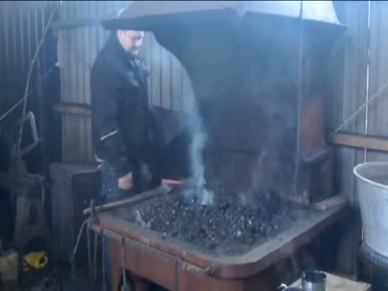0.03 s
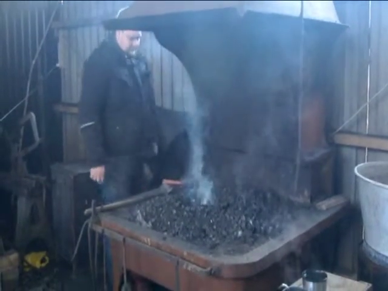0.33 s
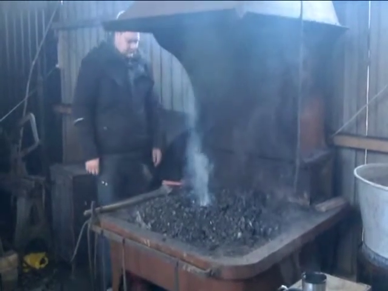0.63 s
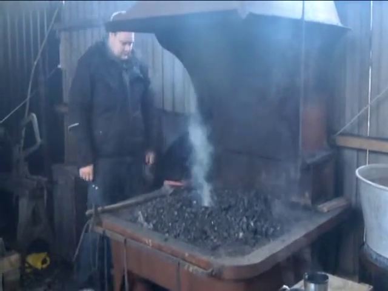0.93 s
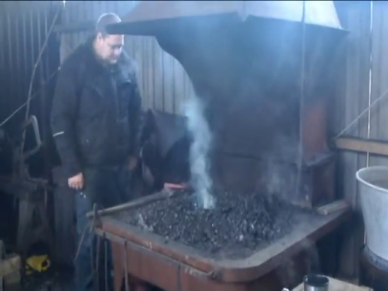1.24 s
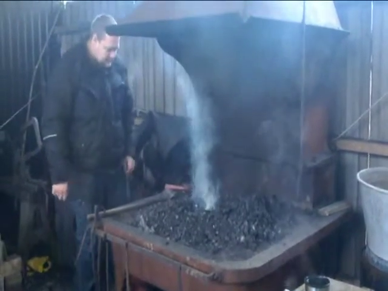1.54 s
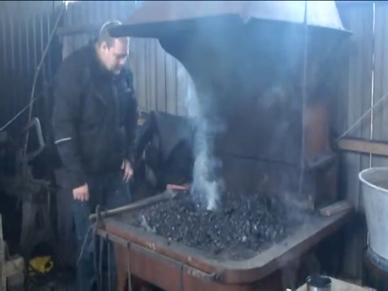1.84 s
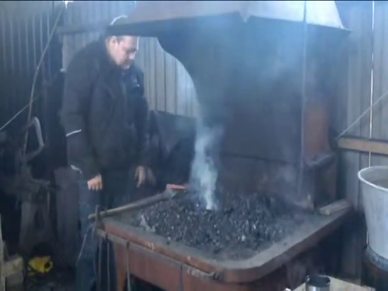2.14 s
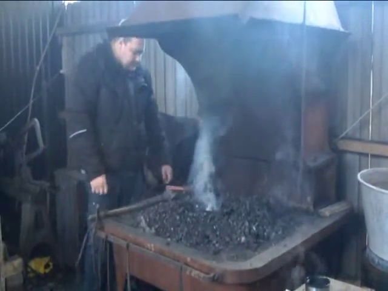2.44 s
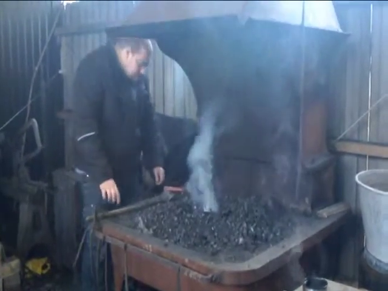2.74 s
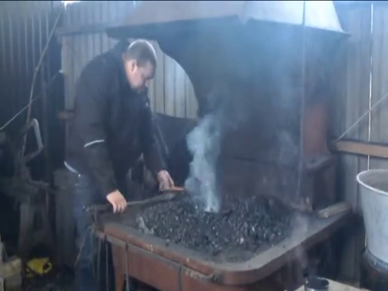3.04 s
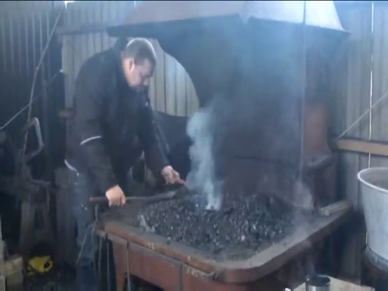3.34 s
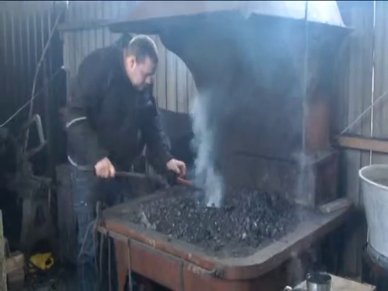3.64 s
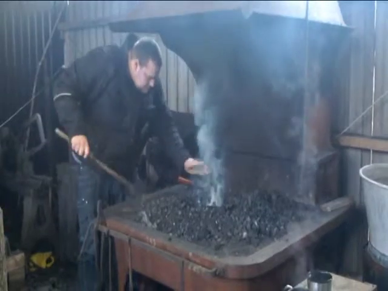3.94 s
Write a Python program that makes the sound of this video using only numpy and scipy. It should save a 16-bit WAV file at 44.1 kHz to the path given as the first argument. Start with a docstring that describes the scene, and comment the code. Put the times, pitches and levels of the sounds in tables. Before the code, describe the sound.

An electric blower hums steadily, feeding a coal forge, with one iron tool knock.

```python
"""An electric blower hums as it feeds a coal forge in a small sheet-metal workshop.
Its spinning blades make the hum, while air rushes through the duct and hisses out of the coal bed.
The coals tick faintly, and a few soft, low thumps sound underneath.
Near the end an iron tool knocks once on the hearth and rings briefly."""
import sys
import numpy as np
from scipy import signal
from scipy.fft import rfft, irfft
from scipy.io import wavfile
from scipy.ndimage import uniform_filter1d

SR = 44100
rng = np.random.default_rng(int(sys.argv[2]) if len(sys.argv) > 2 else 0)


def digitize_waveform(pressure):
    """Quantize a signal to 16-bit integers and store it at the path in sys.argv[1].

    Rows of a 2-D input are taken as channels; values are limited to [-1, 1].
    """
    field = np.atleast_2d(pressure).T
    bounded = np.clip(field, -1, 1)
    quanta = np.round(bounded * 32767).astype(np.int16)
    wavfile.write(sys.argv[1], SR, quanta)


N = 4 * SR

# How long the room takes to fade by 60 dB: pitch_hz, fade_s
ROOM_FADE = [(500, 0.24), (5000, 0.33), (8000, .27), (15000, .15)]
# Echoes from the hood and walls: delay_s, gain
ECHOES = [(.0035, 0.19), (.0065, 0.35), (.01, .27), (.0175, 0.25), (.0225, .22), (.027, .22), (.037, 0.11)]
# Faint noise, separate in each channel, with a low bump near 200 Hz: pitch_hz, relative_db
SIDE_NOISE_COLOUR = [(50, -6), (200, 0), (1100, -16), (2300, 7.5), (3600, -6), (4600, -9), (7400, -6), (8500, 5),
                     (15500, 15)]
# Soft, low thumps: middle_s, level_db
THUMPS = [(.785, -24), (1.195, -25.5), (2.62, -29), (3.525, -26)]
# Ticks and scuffs at the coals: start_s, level_db, fade_s, brightness_db_per_octave
TICKS = [(.99, -32, 0.016, -10), (1.153, -32, .015, -3), (1.468, -35, .025, 1), (1.789, -33, .04, -11),
         (1.961, -40, .025, -1), (2.98, -41, .015, 7), (3.109, -39, .009, 15), (3.16, -46, .009, 13),
         (3.97, -35, .015, -5)]
# Tone of the ticks and crackles: pitch_hz, relative_db
TICK_COLOUR = [(2000, -34), (3500, -16), (4500, 5), (7500, 6.5), (9000, -6), (11000, -4), (13500, -11),
               (15500, -21)]
# Tone of the tool's sharp crack: pitch_hz, relative_db
KNOCK_COLOUR = [(400, -13), (1500, -29), (2600, -22), (3800, -13), (4350, 2), (4850, 5.5), (5600, -2),
                (7700, 3.5), (9000, -8), (10700, 1.5), (12000, -8.5), (16000, -11)]
# Ringing notes of the iron, each fading by 60 dB: pitch_hz, level_db, fade_s
IRON_NOTES = [(4427, -30, 0.052), (4670, -18.5, 0.12), (4867, -28, 0.055), (6530, -41, .08),
              (7300, -26, 0.13), (9660, -37, .06)]
# Tone of the air leaving the coal bed: pitch_hz, relative_db
HISS_COLOUR = [(600, -30), (1950, -25), (2600, -21), (3300, -15), (3750, -13.5), (4250, -3.5), (4650, 0.2),
               (5350, -6.5), (6700, -5.5), (7400, -3), (8100, -12.5), (9050, -23.5), (9800, -13),
               (10500, -22.5), (11900, -27.5), (13200, -24.5), (14200, -34), (15700, -48)]
# Slight rise and fall of the hiss: time_s, change_db
HISS_SWELL = [(0, 0), (1, 0.2), (1.65, 0), (1.95, 0.6), (2.25, 0), (2.6, -0.6), (3.05, 0), (3.45, 0),
              (4, -0.5)]
# Tone of the air in the duct: pitch_hz, relative_db
RUSH_COLOUR = [(4, -23), (12, 13), (22, -2), (45, -2.5), (78, -9), (100, -14), (116, -2), (148, -9),
               (210, -4), (255, -8.5), (290, -9.5), (312, -18.5), (372, -19), (430, -13), (485, -13.5),
               (545, -21), (660, -22), (740, -15), (800, -8), (1040, -13.5), (1130, -17), (1370, -19.5),
               (1450, -25), (1650, -35), (2100, -53), (4000, -69)]
# Hollow notes of the duct and fan housing: pitch_hz, width_hz, level_db
DUCT_NOTES = [(62.8, 7.4, -46), (169.3, 11.3, -36), (182, 18, -36.5), (272.2, 18.7, -40.5),
              (855.8, 34.5, -40), (984, 18, -51.5), (1054, 6.7, -49.5), (1272, 35, -47.5), (1342, 35, -51),
              (1742, 54, -66)]
# How fast the blades pass and how the loudness shifts: time_s, blade_hz, change_db
FAN_SPEED = [(0, 195.45, 0), (.9, 195.3, 0.8), (1.6, 195.4, 0.3), (2.3, 195.4, -0.1), (4, 195.4, -0.1)]
# Tones in the fan's hum: cycles_per_turn, level_db
HUM_TONES = [(3, -46.5), (4, -23.5), (7, -53), (8, -46), (12, -60.5), (16, -41.5), (20, -53.5), (24, -58.5),
             (36, -68.5)]


def amp(db):
    """Turns decibels into a number to multiply by."""
    return 10 ** (np.asarray(db) / 20)


def unit(x):
    """Scales a signal to an average strength (rms) of 1."""
    return x / np.sqrt(np.mean(x ** 2) + 1e-20)


def read(points, hz):
    """Looks up a pitch in a table, sliding between rows on an octave scale."""
    pitches, values = np.transpose(points)
    return np.interp(np.log(hz + 1), np.log(pitches + 1), values)


def bins():
    """The frequencies in Hz that make up the whole sound."""
    return np.fft.rfftfreq(N, 1 / SR)


def noise(gain):
    """Noise of strength 1, with each frequency weighted by gain."""
    return unit(irfft(rfft(rng.standard_normal(N)) * gain, N))


def drift(rate_hz):
    """A smooth random wobble, mostly slower than rate_hz."""
    return noise(np.exp(-(bins() / rate_hz) ** 2) * (bins() > 0))


def colour(x, points):
    """Gives a sound the tone described in a table."""
    hz = abs(np.fft.fftfreq(2048, 1 / SR))
    log_gain = np.log(amp(read(points, hz)))
    taps = np.fft.ifft(np.exp(np.conj(signal.hilbert(log_gain)))).real  # rings only after a hit
    return signal.oaconvolve(x, taps / np.linalg.norm(taps))[:N]


def workshop(x):
    """The hood and walls add quick echoes and a short fading tail to a sound."""
    hz, t, spectrum = signal.stft(rng.standard_normal(SR // 2), SR, nperseg=256)
    fade = amp(-60 * t / read(ROOM_FADE, hz)[:, None])
    rise = np.minimum(t / .008, 1)
    response = signal.istft(spectrum * fade * rise, SR, nperseg=256)[1]
    response *= amp(-1.5) / np.linalg.norm(response)
    response[0] += 1  # the direct sound
    for delay_s, gain in ECHOES:
        response[round(delay_s * SR)] += gain
    return signal.fftconvolve(x, response)[:N]


def thumps(pitch_hz=37.7, width_s=.022):
    """Each thump, perhaps a shifting foot, is a wave or two of deep bass."""
    t, out = np.arange(N) / SR, np.zeros(N)
    for middle_s, level_db in THUMPS:
        swell = amp(level_db) * np.exp(-((t - middle_s) / width_s) ** 2)
        out += swell * np.sin(2 * np.pi * (pitch_hz * (t - middle_s) + rng.random()))
    return out


def coal_ticks(crackles_per_s=14):
    """The coals give a few gritty ticks and scuffs over tiny scattered crackles."""
    t = np.arange(N) / SR
    crackles = amp(-26) * rng.standard_normal(N) * (rng.random(N) < crackles_per_s / SR)
    out = colour(crackles, TICK_COLOUR)
    for start_s, level_db, fade_s, brightness in TICKS:
        fade = (t >= start_s) * np.exp(-abs(t - start_s) / fade_s)
        grit = amp(level_db) * fade * unit(rng.laplace(size=N))
        tone = [(hz, db + brightness * np.log2(hz / TICK_COLOUR[0][0])) for hz, db in TICK_COLOUR]
        out += colour(grit, tone)
    return out


def tool_knock(start_s=3.618, hold_s=.0021, crack_fade_s=.001):
    """Iron hits iron with a hard crack and a short ring."""
    t = np.arange(N) / SR - start_s
    age = np.maximum(t, 0)
    crack = (t >= 0) * np.exp(-np.maximum(age - hold_s, 0) / crack_fade_s) * rng.standard_normal(N)
    ring = sum(amp(db - 60 * age / fade_s) * np.sin(2 * np.pi * hz * age)
               for hz, db, fade_s in IRON_NOTES)
    return amp(-14) * colour(crack, KNOCK_COLOUR) + ring


def coal_hiss(level_db=-31.5, flicker_db=.31, patch_db=.5, room_share=.28):
    """Jets of air hiss through the coal bed, swelling and flickering slightly."""
    hz, _, spectrum = signal.stft(rng.standard_normal(N), SR, nperseg=512, noverlap=384)
    # Random patches of pitch and time turn a little louder or softer.
    patches = uniform_filter1d(rng.standard_normal(spectrum.shape), size=5, axis=0)
    patches = unit(uniform_filter1d(patches, size=24, axis=1))
    spectrum *= amp(read(HISS_COLOUR, hz)[:, None] + patch_db * patches)
    air = signal.istft(spectrum, SR, nperseg=512, noverlap=384)[1][:N]
    air = unit((1 - room_share) * air + room_share * workshop(air))
    swell_db = np.interp(np.arange(N) / SR, *np.transpose(HISS_SWELL))
    return air * amp(level_db + swell_db + flicker_db * drift(rate_hz=24))


def duct_rush(rush_db=-30.5):
    """Swirling air makes a low rush and stirs up the duct's hollow notes."""
    out = amp(rush_db) * noise(amp(read(RUSH_COLOUR, bins())))
    for pitch_hz, width_hz, level_db in DUCT_NOTES:
        peak = 1 / (1 + (2 * (bins() - pitch_hz) / width_hz) ** 2)
        out += amp(level_db) * noise(peak)
    return out


def fan_hum(blades=4, wander_hz=.15):
    """The passing blades make the loudest tone; swirling air shakes the other tones most."""
    t, out = np.arange(N) / SR, np.zeros(N)
    time_s, blade_hz, change_db = np.transpose(FAN_SPEED)
    pitch_hz = np.interp(t, time_s, blade_hz) + wander_hz * drift(rate_hz=2.85)
    turns = np.cumsum(pitch_hz / blades) / SR
    for cycles_per_turn, level_db in HUM_TONES:
        shake = .065 if cycles_per_turn == blades else .28
        flutter = 1 + shake * (drift(rate_hz=8.5) + 1j * drift(rate_hz=11.5))  # in loudness and timing
        tone = np.exp(2j * np.pi * (cycles_per_turn * turns + rng.random()))
        out += amp(level_db) * unit((flutter * tone).real)
    return out * amp(np.interp(t, time_s, change_db))


def scene(right_db=-.0447):
    """Blower, coals, thumps and tool reach the left and right channels almost alike."""
    sound = fan_hum() + duct_rush() + coal_hiss() + thumps() + workshop(tool_knock() + coal_ticks())
    return np.array([sound, amp(right_db) * sound])


def record(dry, cutoff_hz=15850):
    """Faint separate noise is added to each side, then the highest treble is cut."""
    mic_noise = amp(-51) * np.array([noise(amp(read(SIDE_NOISE_COLOUR, bins()))) for _ in dry])
    treble_cut = signal.firwin(511, cutoff_hz, window=("kaiser", 9), fs=SR)
    return signal.oaconvolve(dry + mic_noise, treble_cut[None], "same")


dry = scene()
out = record(dry)
digitize_waveform(out)
```